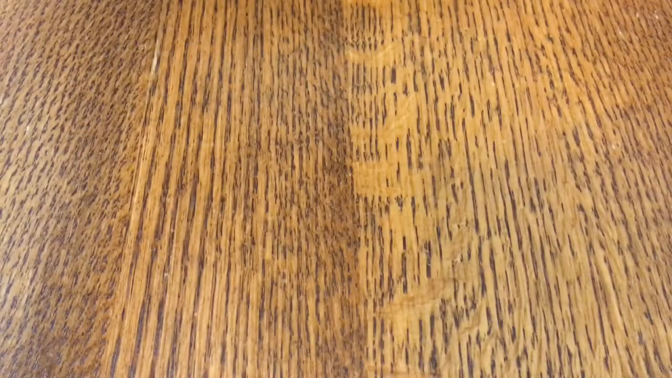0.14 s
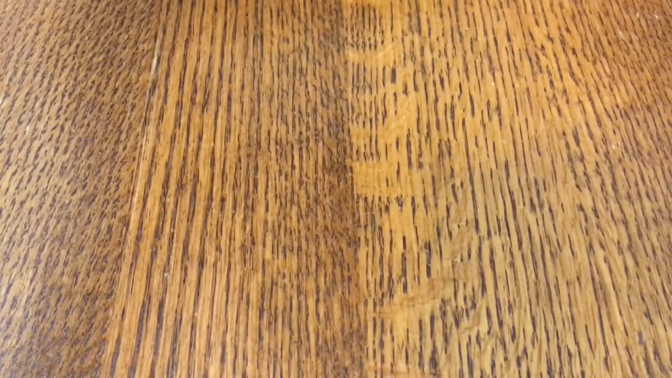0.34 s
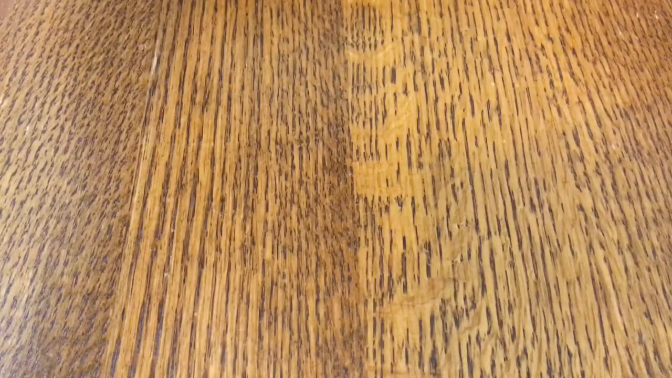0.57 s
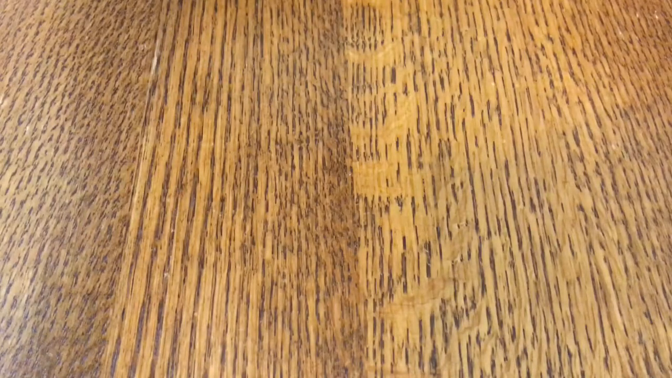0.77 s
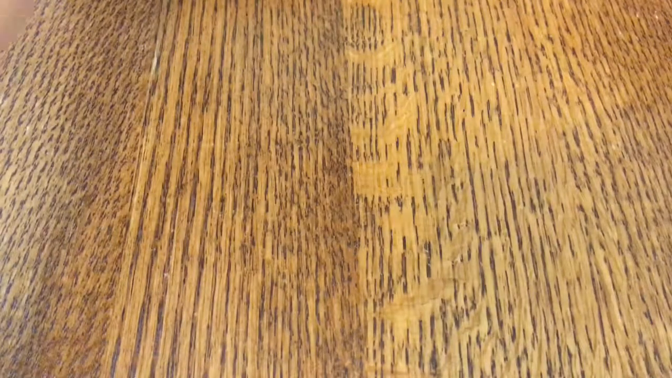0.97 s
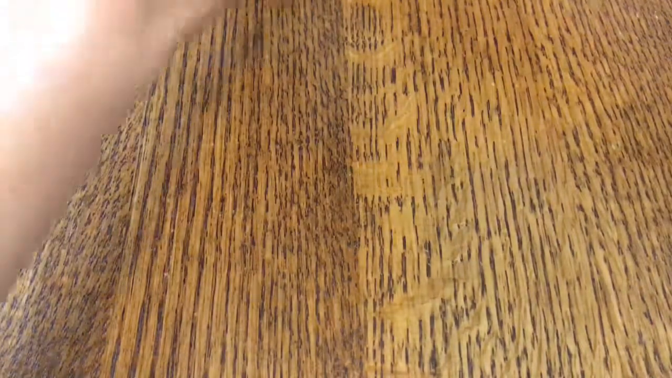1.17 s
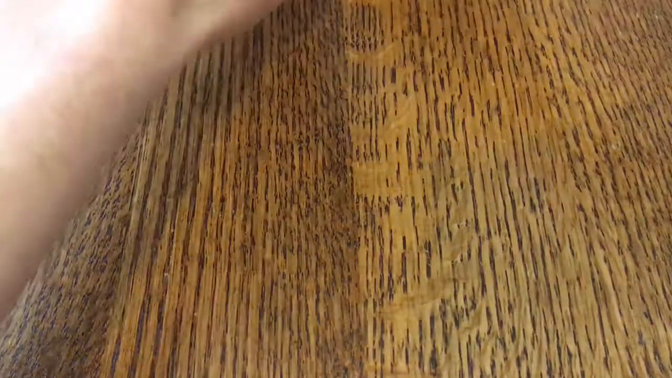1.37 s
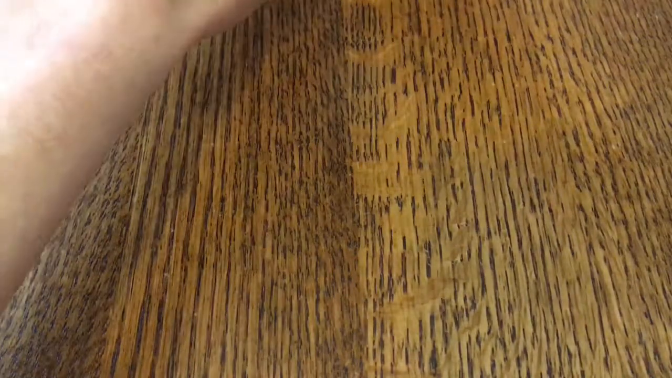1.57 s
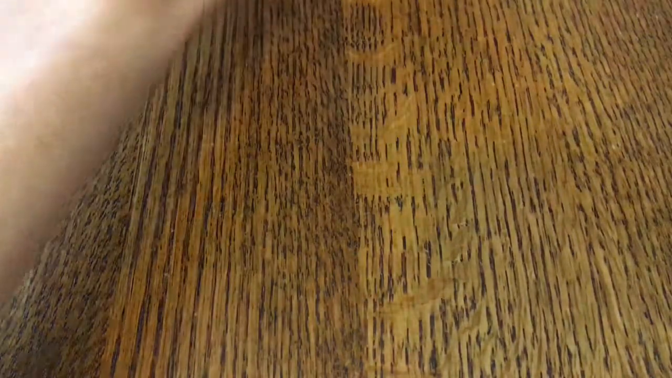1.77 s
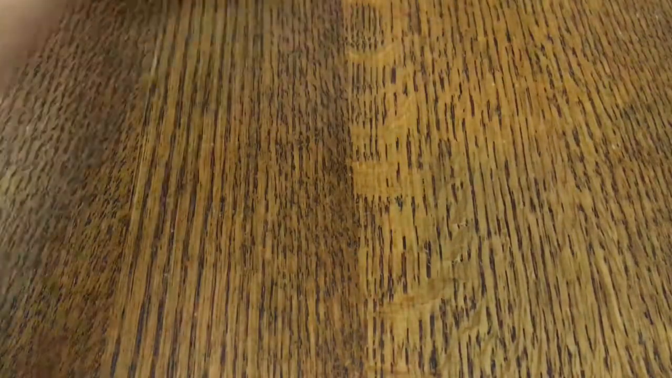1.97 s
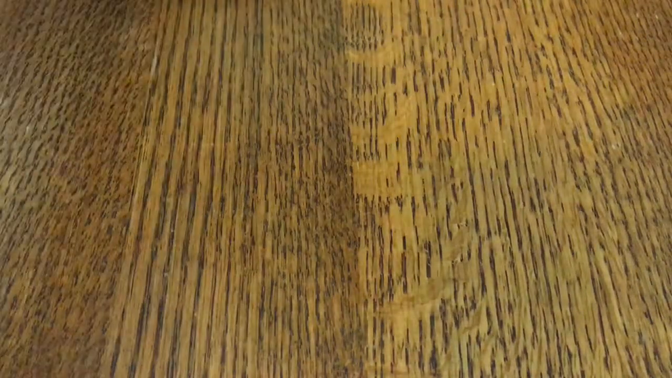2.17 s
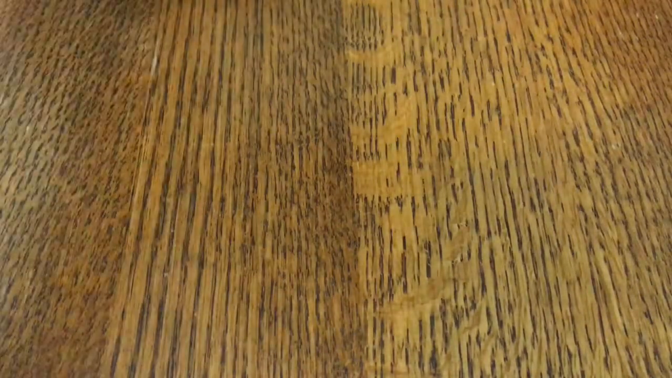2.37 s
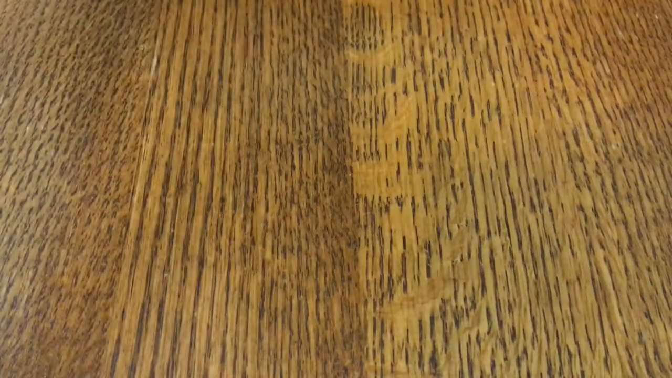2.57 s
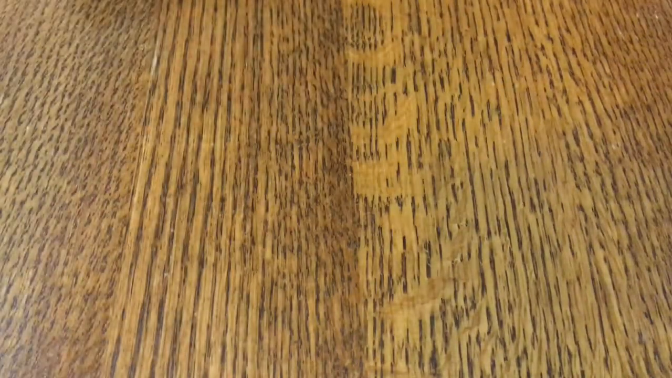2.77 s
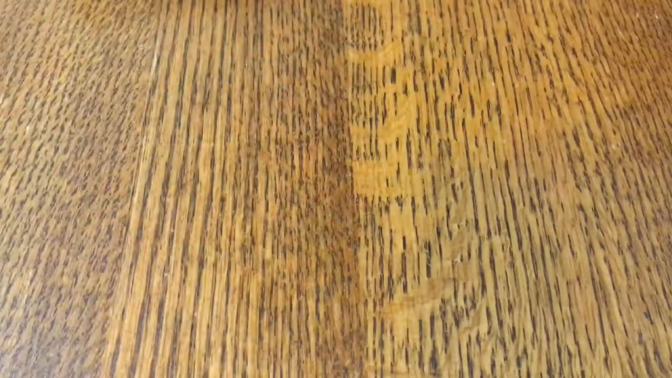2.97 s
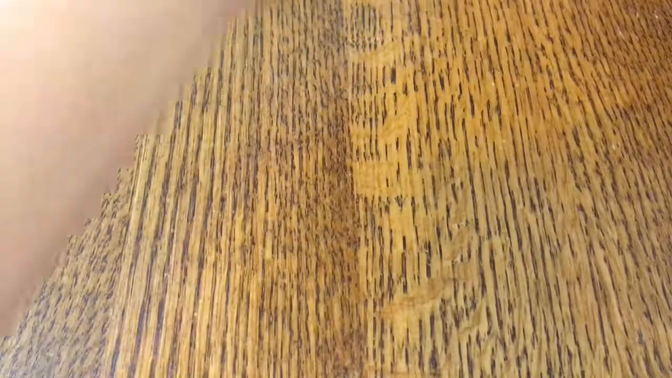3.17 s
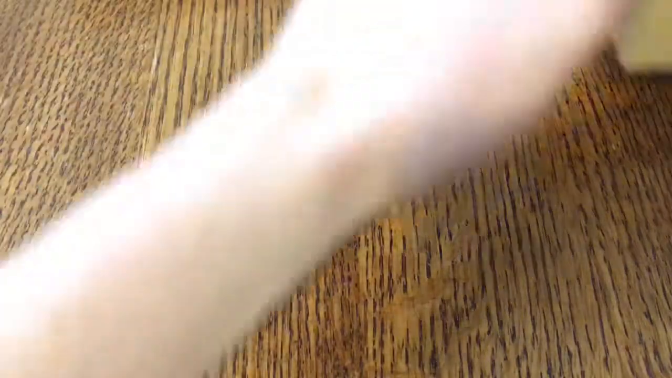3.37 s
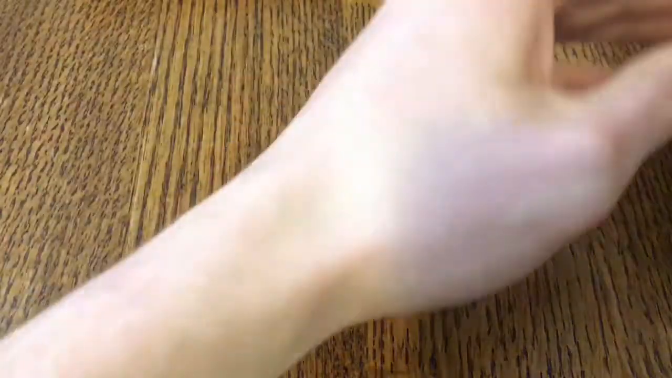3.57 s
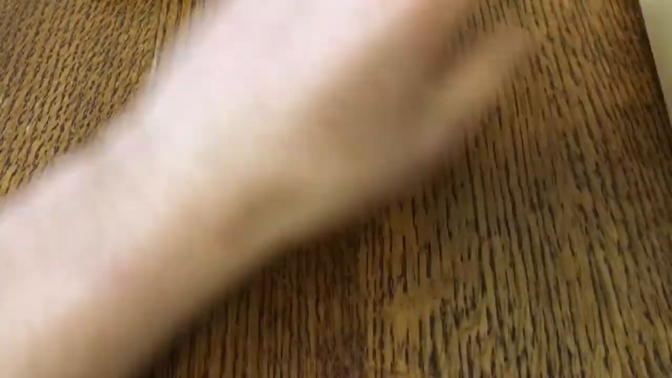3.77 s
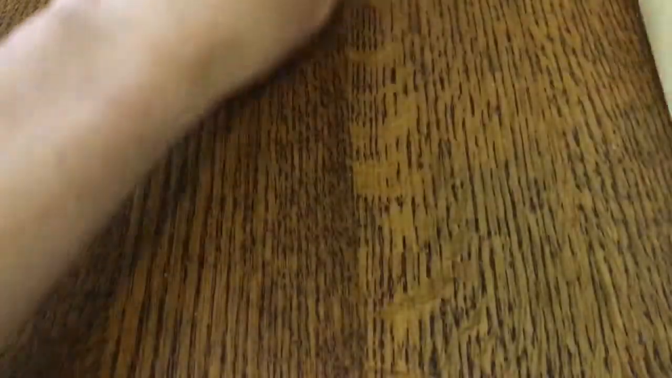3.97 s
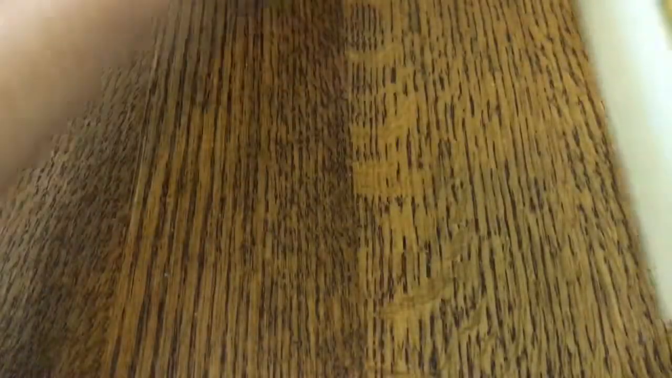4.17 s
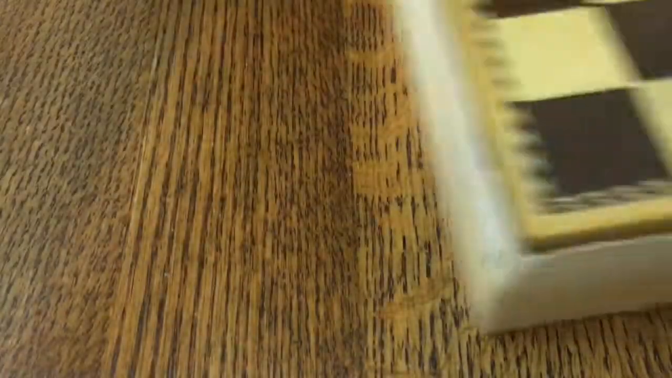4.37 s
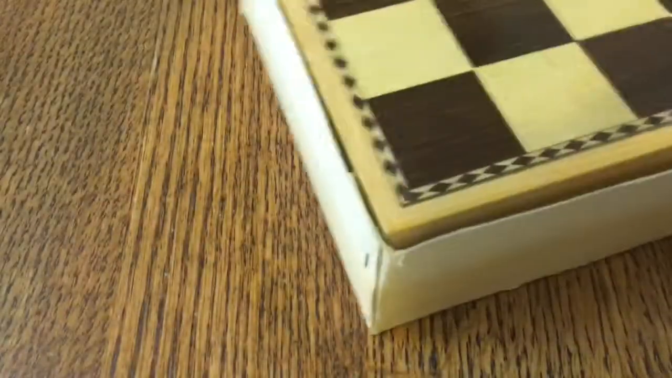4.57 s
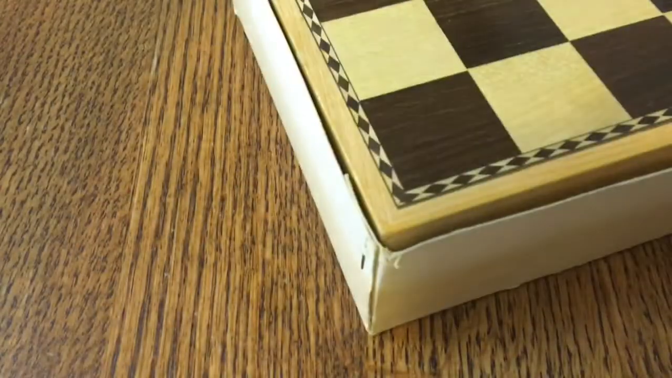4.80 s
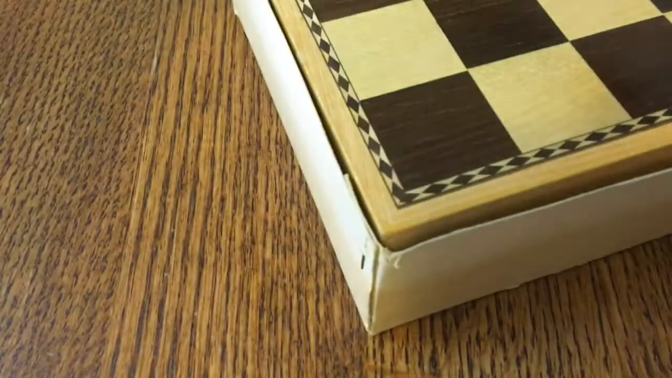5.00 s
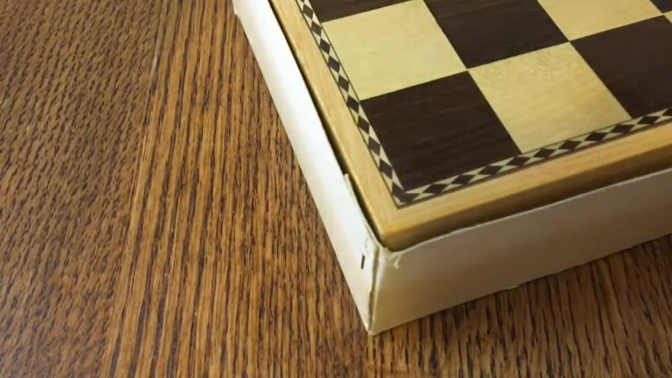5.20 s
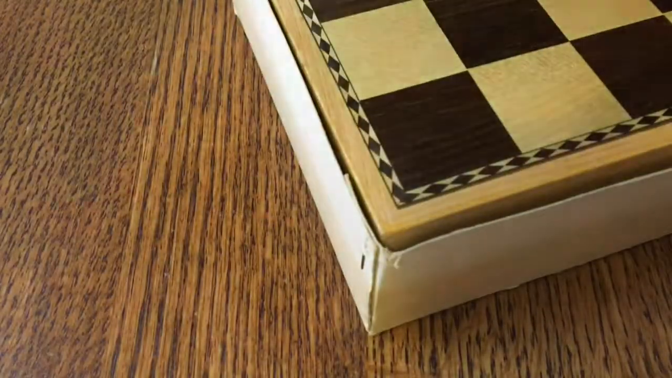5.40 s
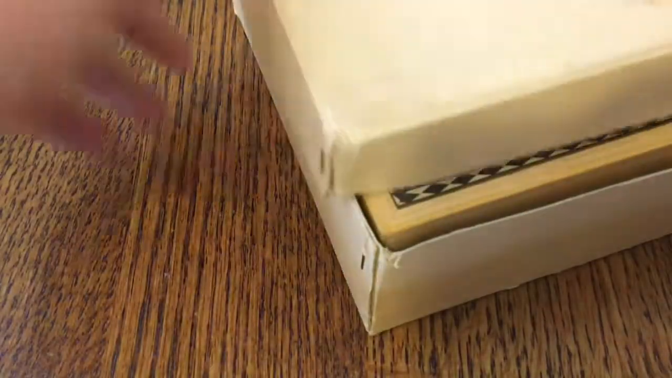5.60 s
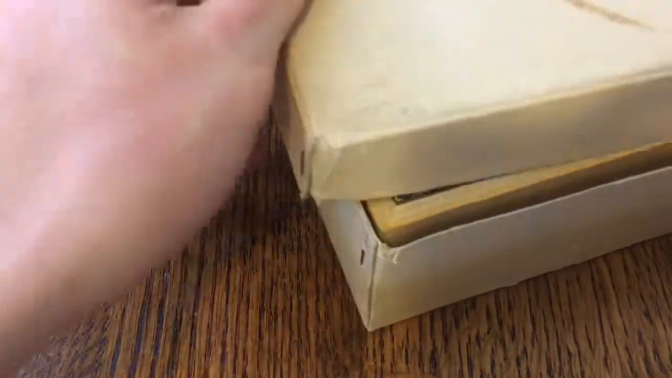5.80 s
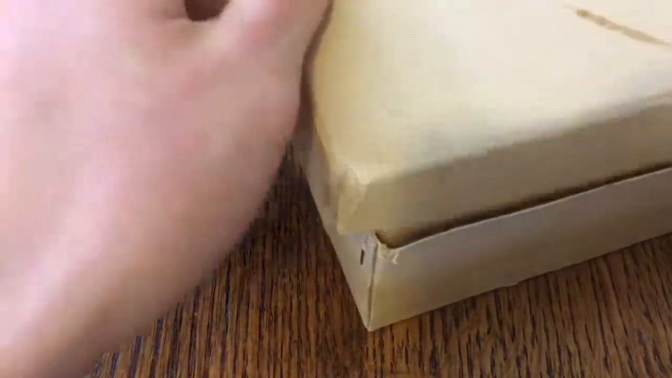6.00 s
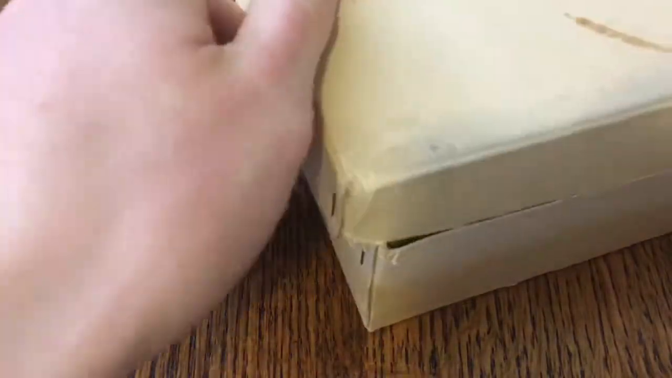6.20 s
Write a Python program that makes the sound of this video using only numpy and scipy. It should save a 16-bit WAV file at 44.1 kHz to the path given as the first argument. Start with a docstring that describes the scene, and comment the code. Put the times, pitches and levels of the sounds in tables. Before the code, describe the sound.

Irregular woody bumps, dry cardboard scrapes and skin-like hiss over low table rumble and faint steady noise. A brisk rattle of knocks early on gives way to lighter handling and near quiet, then a long smooth push across the grain ends in the strongest knock. Afterwards only faint rubbing, until a few crisp cardboard knocks and scuffs near the end. Close phone pickup, short dull room reflection.

```python
"""Boxes shifted on a wooden table

Hands shift a wooden box and a cardboard box about on a table, close to a phone in a quiet room.
Knocks ring the decaying modes of box walls and table top; card and skin slide in dense tiny random slips
through broad resonances. Under the hands the table rumbles as shaped noise, over steady faint noise.
"""
import sys
import numpy as np
from scipy import signal
from scipy.fft import rfft, irfft
from scipy.io import wavfile
from scipy.ndimage import uniform_filter1d

SR = 44100
rng = np.random.default_rng(int(sys.argv[2]) if len(sys.argv) > 2 else 0)


def wrap_up_sound(samples):
    """Save the sound to the file named by the first command line argument, as 16-bit audio."""
    columns = np.atleast_2d(samples).T
    # keep every value between -1 and 1, then stretch to whole-number steps
    tamed = np.clip(columns, -1, 1)
    steps = np.round(tamed * 32767).astype(np.int16)
    wavfile.write(sys.argv[1], SR, steps)


N = 275625  # length in samples

# Steady room and microphone noise. Each row: frequency in Hz, relative density in dB per Hz.
AIR_COLOUR = [(240, -34), (400, -13.5), (605, -49), (1020, -11), (1360, -15.5), (9210, -25), (10400, -28.5),
              (15500, -25.5)]
AIR_DB = -73

# Hands leaning on the table. Each row: time in seconds, deep shudder in dB, rumble of the table top in dB.
LEAN = [(0.0, -42.5, -51.5), (0.33, -70, -45), (0.39, -59, -35), (0.64, -51, -61), (1.25, -54, -75.5),
        (1.74, -49, -45), (2.1, -53, -58.5), (2.7, -55.5, -63), (2.85, -46.5, -66), (3.05, -55, -58.5),
        (3.85, -48, -56), (3.97, -34.5, -40), (4.12, -48.5, -56.5), (4.55, -47, -44), (4.59, -37, -58),
        (4.78, -67, -56), (4.96, -50, -55), (5.55, -58.5, -67), (5.61, -33, -65), (5.78, -53, -51),
        (6.09, -43.5, -58), (6.25, -59, -56)]
# Deep shudder of the table. Each row: frequency in Hz, width of one filter pass in Hz, relative level in dB.
SHUDDER = [(51, 137, -16.5), (88, 8.3, -39)]
# Rumble of the table top. Each row: frequency in Hz, relative density in dB per Hz.
RUMBLE_COLOUR = [(53, -47), (90, 9.5), (124, -13), (178, 13), (273, 8), (394, 5), (600, -28), (780, -17.5),
                 (1320, -120)]

# Strokes of card and skin on wood. Each row: time of full speed in seconds, run-up over 20 dB in ms,
# hold in ms, scrape in dB, fine hiss above the scrape in dB, brightest pitch in Hz.
STROKES = [(0.0, 10, 610, -57, -5, 2200), (0.374, 70.5, 37, -45.5, 0.5, 2030),
           (0.566, 39, 96, -52.5, -5, 2230), (0.741, 21, 175, -74, -5, 2280),
           (0.879, 11, 86, -46, -5.5, 2140), (1.302, 16.5, 35, -51, -9.5, 2240),
           (1.44, 77, 95, -66, -2, 2840), (1.562, 14, 93, -53.5, -7.5, 2260),
           (1.696, 31, 49, -45, -3.5, 1870), (1.902, 138, 62, -54.5, 2.5, 2600),
           (2.134, 2, 37, -59.5, -5, 2250), (2.227, 16, 46, -58.5, -4, 2400), (2.32, 4, 160, -57, -4, 2560),
           (2.79, 67, 61, -71, -0.5, 2280), (2.99, 25.5, 100, -72, 3, 3220),
           (3.105, 145, 72, -64.5, 0.5, 3860), (3.462, 23, 75, -44.5, -8, 4440),
           (3.551, 21, 157, -52, 0.5, 3800), (3.778, 65, 198, -57.5, -0.5, 2380),
           (3.962, 9, 130, -54, -5, 2400), (4.134, 54, 17, -50.5, -1, 2220),
           (4.24, 65, 50, -53.5, 2.5, 2780), (4.309, 44, 160, -45, 3.5, 3200),
           (4.459, 127, 200, -51, 8, 2600), (4.578, 4.5, 25, -64, -2, 1900),
           (4.722, 35, 320, -65, -24, 2160), (4.906, 103, 146, -55.5, -4.5, 2700),
           (5.149, 69, 58, -61, -5, 2550), (5.23, 47, 28, -50, -8, 2100), (5.342, 38, 89, -67, -6, 3400),
           (5.497, 4, 13, -62, -5, 2600), (5.606, 20, 99, -46, -8, 2370),
           (5.727, 23, 88, -46.5, -9.5, 3050), (5.87, 42, 72, -61.5, -12, 3030),
           (6.004, 51, 156, -56, -9.5, 2480), (6.225, 60, 57, -53.5, -7, 3060)]
# Resonances of the scraped card. Each row: frequency in Hz, width of one pass in Hz, relative level in dB.
SCRAPE = [(1230, 820, 34.5), (2090, 520, 14), (2800, 3660, 23), (3950, 950, -13.5), (5460, 440, 10)]
# Fine hiss of skin. Each row: frequency in Hz, width of one pass in Hz, relative level in dB.
HISS = [(5830, 3100, 17.5), (9200, 1750, 11.5), (12070, 3000, 11), (14600, 5500, 3)]
# The box floor sings in the long push. Each row: frequency in Hz, width of one pass in Hz, relative level in dB.
BOX_FLOOR = [(2790, 140, -7), (2507, 140, -4.5), (1910, 500, -4)]

# Table top. Each row: frequency in Hz, relative level in dB, t60 in seconds while unloaded.
TABLE = [(129.5, 0, .45), (188, -5, .2)]
# Box walls before detuning. Each row: frequency in Hz, relative level in dB, t60 in seconds.
BOX = [(196.3, 0, 0.081), (305, 7.5, 0.025), (358, 8, 0.03), (461.3, -3.5, 0.082), (534, -0.5, 0.014),
       (651.6, 10, 0.018), (727, 1, 0.062), (858, 8, 0.016), (963, 3.5, 0.036), (1256, 4, 0.043),
       (1506, 4, 0.041), (1740, 5, 0.016), (1953, 6, 0.026), (2190, 15, 0.0055), (2700, 3, 0.027),
       (3130, 14.5, 0.0028)]
# Knocks that reach the table. Each row: start in seconds, relative ring level in dB, centre of the ring in Hz,
# relative edge crack in dB, relative table thud in dB.
KNOCKS = [(0.106, -26, 320, -39.5, -57), (0.148, -33, 350, -69, -63), (0.172, -30.5, 373, -61, -60),
          (0.214, -28, 290, -46.5, -53), (0.239, -27.5, 304, -57, -39.5), (0.377, -20, 640, -63, -38),
          (0.393, -10.5, 716, -35.5, -19), (0.399, -12, 330, -40, -31), (0.404, -7, 740, -55, -35),
          (0.416, -10.5, 1170, -36.5, -37), (0.591, -21, 370, -48.5, -38), (0.678, -35, 350, -71, -51),
          (0.874, -23.5, 253, -46, -70), (0.898, -18.5, 324, -40, -35.5), (0.932, -21, 298, -70, -43.5),
          (0.96, -18, 350, -39, -41), (1.293, -24, 304, -53.5, -68), (1.307, -23, 333, -63, -57),
          (1.321, -22, 420, -47, -55), (1.343, -32, 400, -74, -46), (1.56, -27.5, 357, -56, -48),
          (1.644, -27, 338, -48.5, -42), (1.686, -28.5, 300, -54, -56), (1.734, -16.5, 830, -32, -39),
          (1.737, -22.5, 230, -57, -38), (1.748, -19, 1140, -61, -55), (2.16, -33.5, 239, -81, -47),
          (2.224, -28, 380, -39.5, -46), (3.43, -19.5, 256, -47, -65), (3.748, -59, 246, -63, -40),
          (3.805, -22.5, 320, -55, -26), (3.898, -28, 360, -83, -28), (3.962, -17, 900, -36.5, -58),
          (3.968, -16.5, 276, -59, -55), (3.977, -16.5, 224, -47.5, -54), (4.006, -23.5, 244, -56, -57),
          (4.296, -13, 355, -74, -22), (4.322, -16, 327, -57, -19.5), (4.362, -22, 373, -55, -39),
          (4.57, -21, 408, -49, -48), (4.574, -3.5, 1430, -27.5, -16), (4.576, 1, 252.6, -44, -20.5),
          (4.817, -39, 294, -64, -62), (4.913, -35.5, 256, -47, -46), (5.489, -59, 249, -87, -43),
          (5.566, -31.5, 287, -70, -47), (5.604, -9.5, 1340, -37, -45), (5.621, -24, 950, -50, -40),
          (5.641, -12.5, 1620, -46.5, -54), (5.762, -22.5, 360, -48, -38.5),
          (6.085, -22.5, 267, -52, -43.5)]
# Light taps and ticks on the boxes alone. Each row: start in seconds, relative ring level in dB,
# centre of the ring in Hz, relative edge crack in dB.
TAPS = [(0.034, -33, 580, -81), (1.701, -33, 2400, -42), (1.719, -24, 2550, -42.5), (1.849, -33, 1550, -52),
        (1.959, -21, 776, -35.5), (1.994, -27, 760, -46), (2.135, -39.5, 656, -56.5),
        (2.322, -31.5, 2560, -42), (2.527, -38, 686, -60.5), (2.565, -40.5, 700, -69),
        (2.621, -37, 760, -57.5), (2.861, -39, 2260, -58.5), (3.182, -33, 600, -94),
        (3.222, -36.5, 680, -60), (3.274, -45, 1230, -67), (3.289, -30.5, 570, -83),
        (3.589, -34.5, 900, -52), (3.653, -34, 820, -60), (3.767, -39, 1220, -55),
        (4.13, -22.5, 1650, -31.5), (5.231, -35, 1570, -93), (5.262, -34, 2180, -92),
        (5.666, -30, 1680, -80), (5.926, -42, 1100, -64), (6.086, -21.5, 1035, -67),
        (6.226, -39, 1080, -77)]

ROOM_T60_S, ROOM_DB, ROOM_DULL_HZ = 0.24, -15.5, 4580
LOW_CUT_HZ, TOP_HZ = 62, 15720  # limits of the phone
SAG_DB_S, RELEASE_DB_S = 41, 381  # every stroke tires from full speed on; release adds to this after the hold
DRONE_DB, DRONE_DB_PER_OCTAVE = 2, -9  # wall drone above a 2 kHz scrape; brighter strokes drone less
PUSH_S = (4.33, 4.56)  # the long push across the grain: start, end
PUSH_GLIDE_HZ = (2640, 2300)  # the song sinks as the push slows
BOX_FLOOR_DB = -45.5
LOADED_DAMPING_DB_S = 125.5  # extra fade of the table once the box rests on it
# a broad face rings low and rattles long, an edge rings high and short
RATTLE_MS, RATTLE_PER_OCTAVE = 4.5, .85  # rattle at 300 Hz, its factor per octave up
FOCUS_OCTAVES, EDGE_SPREAD = 0.42, 0.13  # span of shaken modes up to 300 Hz, its growth per octave above
TAP_RATTLE_MS, TAP_FOCUS_OCTAVES = 5, 0.21
TOUCH_MS = .8  # the contact closes gradually
PUSH_CYCLES = .55  # length of the first touch, in cycles of the ring
DETUNE = .045  # the grip bends each mode by this random fraction


def undb(db):
    """dB to gain."""
    return 10 ** (np.asarray(db) / 20)


def unit(x):
    """Scale to rms 1."""
    return x / np.sqrt(np.mean(x ** 2))


def convolve(x, response):
    """Pass x through an impulse response, keeping its length."""
    return signal.fftconvolve(x, response)[:len(x)]


def bandpass(x, order, low_hz, high_hz):
    """Keep what lies between two frequencies."""
    return signal.sosfilt(signal.butter(order, [low_hz, high_hz], "band", fs=SR, output="sos"), x)


def ringing(modes, gains, seconds):
    """Impulse response of decaying modes, neighbours in opposite phase."""
    t = np.arange(int(seconds * SR)) / SR
    out = 0
    for k, ((hz, db, t60), gain) in enumerate(zip(modes, gains)):
        decay = undb(db - 60 * t / t60)
        out = out + (-1) ** k * gain * decay * np.sin(2 * np.pi * hz * t)
    return out


def resonate(x, peaks, lift_db=None):
    """Sum broad resonances, neighbours in opposite phase; lift_db(hz) may shift their balance in time."""
    out, power = 0, 0
    for k, (hz, width, db) in enumerate(peaks):
        b, a = signal.iirpeak(hz, hz / width, fs=SR)
        twice = signal.lfilter(b, a, signal.lfilter(b, a, x))  # steep skirts
        band = (-1) ** k * undb(db) * twice
        gain = undb(lift_db(hz)) if lift_db else 1
        out = out + gain * band
        power = power + gain ** 2 * np.mean(band ** 2)
    return out / np.sqrt(power)


def coloured(spectrum):
    """Noise of rms 1 with a spectrum drawn through (Hz, dB) points."""
    hz, db = np.transpose(spectrum)
    bins = np.maximum(np.fft.rfftfreq(N, 1 / SR), 1)
    shape = undb(np.interp(np.log(bins), np.log(hz), db))
    return unit(irfft(rfft(rng.standard_normal(N)) * shape, N))


def flicker(rate, db):
    """Gain gliding between random levels of spread db, new ones rate times a second."""
    k = int(SR / rate)
    levels = np.repeat(rng.standard_normal(N // k + 1), k)
    return undb(db * uniform_filter1d(levels, k)[:N])


def slips(per_s, scatter_db):
    """Tiny stick-slip releases at random moments, a few much larger than the rest."""
    when = rng.random(N) < per_s / SR
    size = np.minimum(rng.exponential(size=N), 5)
    return when * rng.standard_normal(N) * undb(scatter_db * size)


def curves(table):
    """Gain curves from rows of seconds and levels in dB."""
    s, *columns = np.transpose(table)
    return [undb(np.interp(np.arange(N) / SR, s, c)) for c in columns]


def add(track, s, sound):
    """Mix a sound in at time s."""
    i = int(s * SR)
    track[i:i + len(sound)] += sound[:N - i]


def air():
    """Steady noise of the room and the microphone."""
    return undb(AIR_DB) * coloured(AIR_COLOUR)


def room(x):
    """Short diffuse tail of a furnished room, duller than the direct sound."""
    t = np.arange(int(ROOM_T60_S * SR)) / SR
    tail = rng.standard_normal(len(t)) * undb(-60 * t / ROOM_T60_S)
    tail = bandpass(tail * (t > .004), 1, 450, ROOM_DULL_HZ)
    return undb(ROOM_DB) * convolve(x, tail / np.sqrt(np.sum(tail ** 2)))


def rumble(scrape, bright_hz):
    """Shifting weight shakes the table legs and top; coarse slips of the grip drone in the box walls."""
    deep, top = curves(LEAN)
    shudder = deep * resonate(rng.standard_normal(N), SHUDDER)
    drone = scrape * undb(DRONE_DB + DRONE_DB_PER_OCTAVE * np.log2(bright_hz / 2000))
    upper_modes = BOX[3:]
    walls = unit(convolve(slips(1500, 3.0), ringing(upper_modes, np.ones(len(upper_modes)), .12)))
    uneven = flicker(30, 2.5)
    return shudder + uneven * (top * coloured(RUMBLE_COLOUR) + drone * walls)


def strokes():
    """Gains of scrape and hiss and the brightest pitch; overlapping strokes add in power."""
    t = np.arange(N) / SR
    scrape, hiss, pitch = 1e-14, 0, 2500e-14  # a trace at 2500 Hz keeps the pitch defined
    for s, rise_ms, hold_ms, db, hiss_db, hz in STROKES:
        after = t - s
        fall_db = np.where(after < 0, -20 * after * 1000 / rise_ms, SAG_DB_S * after)
        release_db = RELEASE_DB_S * np.maximum(after - hold_ms / 1000, 0)
        power = undb(db - fall_db - release_db) ** 2
        scrape = scrape + power
        hiss = hiss + power * undb(hiss_db) ** 2
        pitch = pitch + power * hz  # weighted by power
    return np.sqrt(scrape), np.sqrt(hiss), pitch / scrape


def push_song(t):
    """Slips in the long push make the box floor sing, its strongest pitch sinking."""
    song_hz = np.interp(t, PUSH_S, PUSH_GLIDE_HZ)
    return resonate(slips(3000, 1.8), BOX_FLOOR, lambda hz: -25 * np.abs(np.log2(hz / song_hz)))


def sliding(scrape, hiss, bright_hz, db_per_octave=9, creases_db=-2, crackle_db=-3):
    """Fine slips excite the card edge, the finest hiss like skin on paper; the long push also sings."""
    t = np.arange(N) / SR
    grip = flicker(70, 2.0) * flicker(28, 3.0)

    def slope_db(hz):
        """Speed and pressure move the strongest resonance; the others fall away from it."""
        return -db_per_octave * np.abs(np.log2(hz / bright_hz))

    card = resonate(slips(4000, 1.9), SCRAPE, slope_db)
    # small panels between creases ring narrowly, each for a moment
    panels = [(hz, hz / 14, 0) for hz in np.geomspace(800, 4800, num=18)]
    creases = resonate(slips(4000, 2.2), panels, lambda hz: slope_db(hz) + 20 * np.log10(flicker(14, 7.0)))
    # each band of the hiss wavers by itself
    skin = resonate(slips(13000, 2.4), HISS, lambda hz: 20 * np.log10(flicker(10.0, 3.2)))
    crackle = resonate(slips(340, 2.1), SCRAPE + HISS, slope_db)  # fibres catching one by one
    rub = scrape * (card + undb(creases_db) * creases + undb(crackle_db) * crackle) + hiss * skin
    pushing = uniform_filter1d(1. * (t > PUSH_S[0]) * (t < PUSH_S[1]), size=2000)
    steadied = grip ** (1 - 0.85 * pushing)  # the heavy box slides more evenly
    return steadied * (rub + undb(BOX_FLOOR_DB) * pushing * push_song(t))


def boom(thud_gain_db=-2, swell_ms=0.94):
    """The table top gathers the energy of each knock and rings it out in its low modes."""
    t, out = np.arange(N) / SR, 0
    after = t[:SR]
    for hz, db, t60 in TABLE:
        energy = np.zeros(N)
        for s, *_, thud_db in KNOCKS:
            fall_db_s = 60 / t60 + LOADED_DAMPING_DB_S * (s > PUSH_S[1])
            swell = np.expm1(-after * 1000 / swell_ms)
            add(energy, s, (undb(thud_db - fall_db_s * after) * swell) ** 2)
        out = out + undb(db + thud_gain_db) * np.sqrt(energy) * np.sin(2 * np.pi * hz * t)
    return out


def facing_walls(focus):
    """Response of two facing walls, never quite in tune."""
    walls = 0
    for bend in rng.standard_normal((2, len(BOX))):
        bent = [(hz * (1 + DETUNE * b), db, t60) for (hz, db, t60), b in zip(BOX, bend)]
        walls = walls + ringing(bent, focus, 0.1)
    return walls


def contact(ring_db, hz, edge_db, rattle_ms, focus_octaves, crack_db=12, spill_db=13):
    """A touch and a gritty rattle ring the wall modes near the centre; harder edges reach all modes and crack."""
    t = np.arange(SR // 6) / SR
    fade = np.exp(-t * 1000 / rattle_ms) * -np.expm1(-t * 1000 / TOUCH_MS)
    # uneven micro-impacts under a millisecond long
    grit = np.repeat(rng.exponential(size=len(t) // 30 + 1), 30)[:len(t)]
    rattle = rng.standard_normal(len(t)) * fade * grit / np.sqrt(2)

    spill = min(undb(edge_db - ring_db + spill_db), 1)
    octaves_off = np.log2(np.array(BOX)[:, 0] / hz)
    focus = np.exp(-.5 * (octaves_off / focus_octaves) ** 2) + spill
    focus = focus * undb(3 * rng.standard_normal(len(BOX)))  # each blow lands on another spot

    push = np.sin(np.pi * np.minimum(t * hz / PUSH_CYCLES, 1)) ** 2  # a low, broad face meets the wood more softly
    # at low pitch the first touch carries two thirds of the energy
    blow = rattle + np.sqrt(2 * np.sum(fade ** 2)) * push / push.sum()
    ring = convolve(blow, facing_walls(focus))
    crest = np.sqrt(2 * uniform_filter1d(ring ** 2, size=200).max())  # loudest 200 samples
    crack = bandpass(rattle, 2, 1500, 8000)
    return ring * undb(ring_db) / crest / 2 + crack / np.abs(crack).max() * undb(edge_db + crack_db)


def knocks():
    """Knocks shake many wall modes and the table; light taps mostly the few modes under the finger."""
    out = boom()
    for s, db, hz, edge_db, _ in KNOCKS:
        octaves_up = np.log2(hz / 300)
        rattle_ms = RATTLE_MS * RATTLE_PER_OCTAVE ** octaves_up
        focus_octaves = FOCUS_OCTAVES + EDGE_SPREAD * max(octaves_up, 0)
        add(out, s, contact(db, hz, edge_db, rattle_ms, focus_octaves))
    for s, *blow in TAPS:
        add(out, s, contact(*blow, TAP_RATTLE_MS, TAP_FOCUS_OCTAVES))
    return out


def scene():
    """Hands, boxes and table in the room, over its steady noise."""
    scrape, hiss, bright_hz = strokes()
    near = knocks() + sliding(scrape, hiss, bright_hz)
    return (near + room(near) + rumble(scrape, bright_hz) + air())[None]


def record(dry):
    """The phone drops the deepest bass and cuts the top."""
    thin = signal.sosfilt(signal.butter(3, LOW_CUT_HZ, "high", fs=SR, output="sos"), dry)
    return signal.sosfilt(signal.ellip(10, .2, 60, TOP_HZ, fs=SR, output="sos"), thin)


dry = scene()
out = record(dry)
wrap_up_sound(out)
```